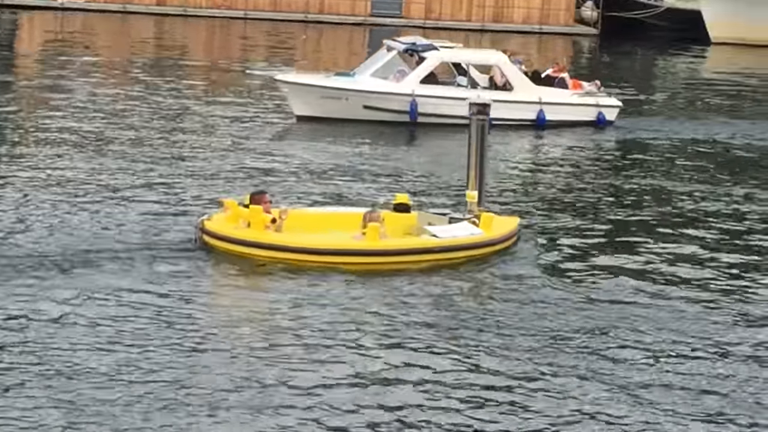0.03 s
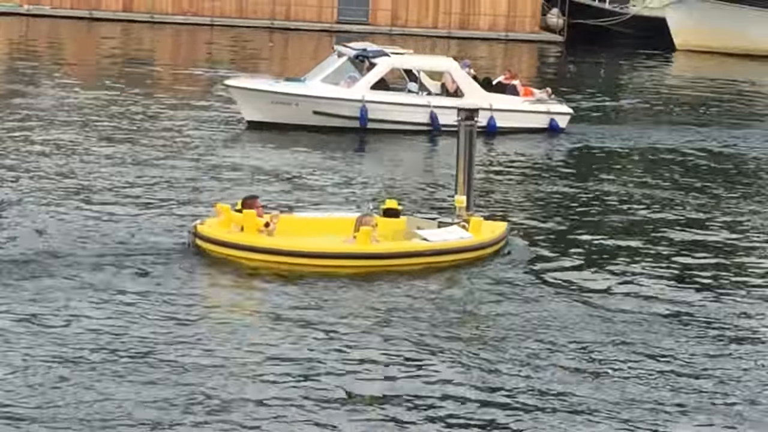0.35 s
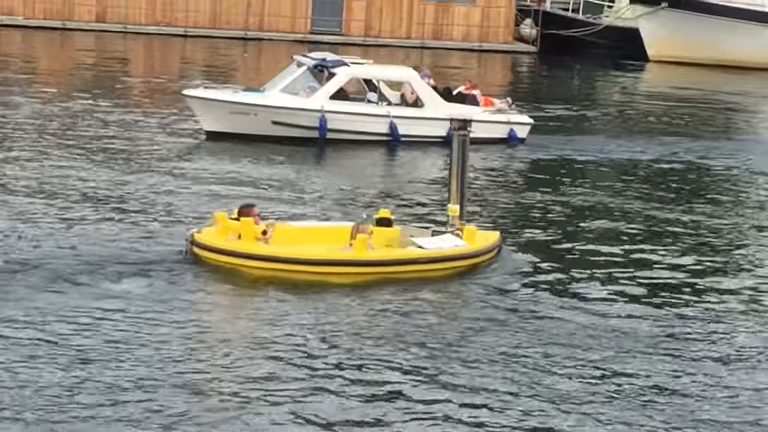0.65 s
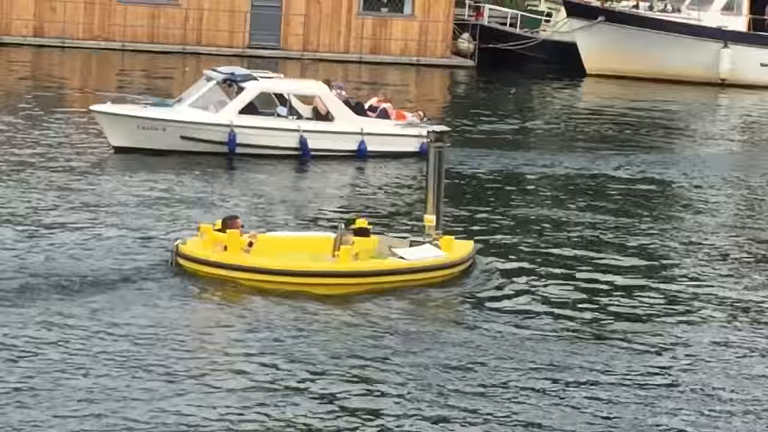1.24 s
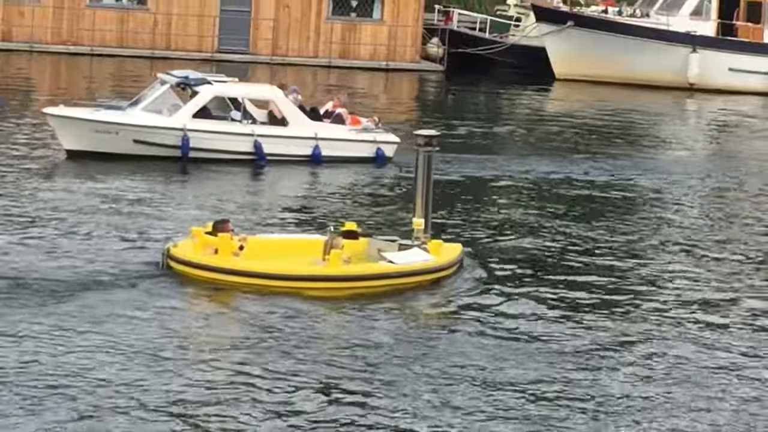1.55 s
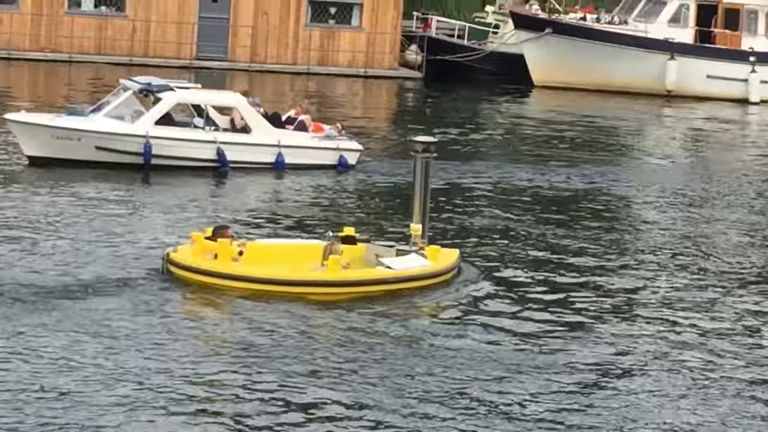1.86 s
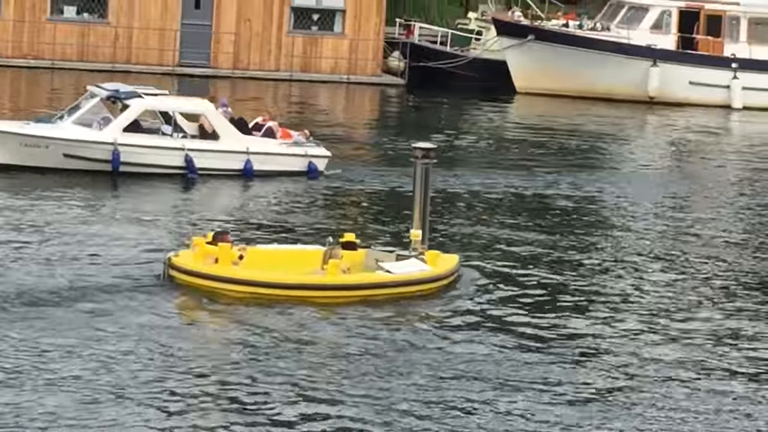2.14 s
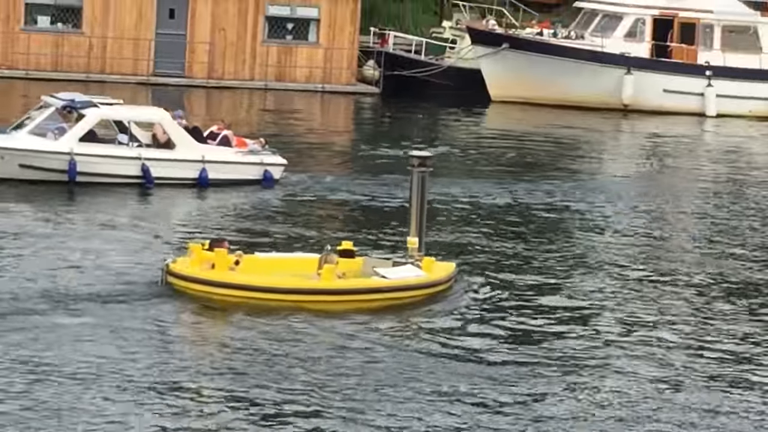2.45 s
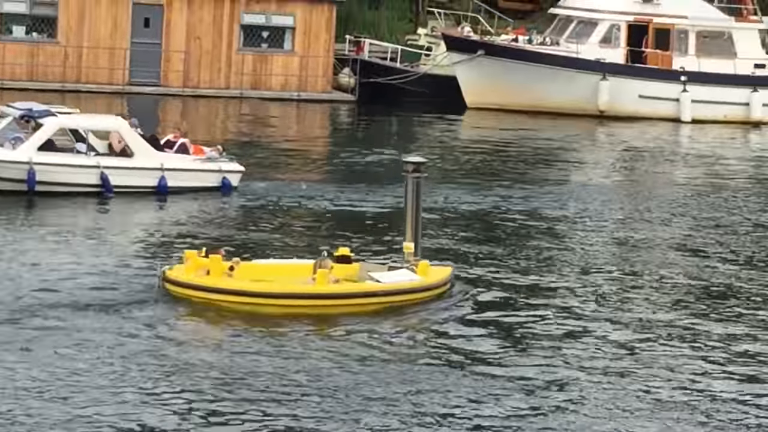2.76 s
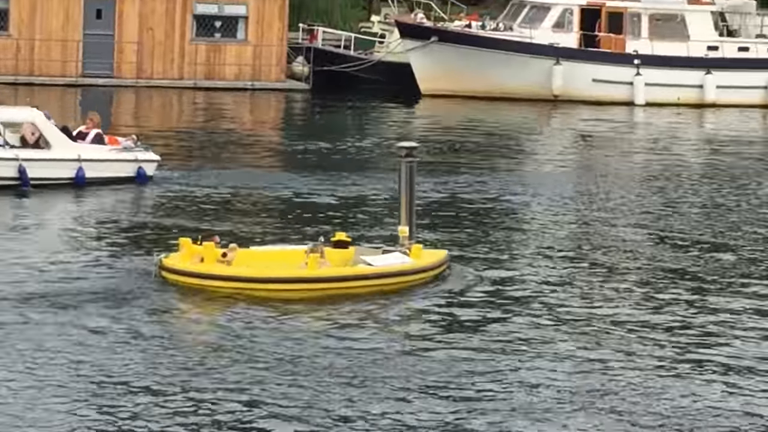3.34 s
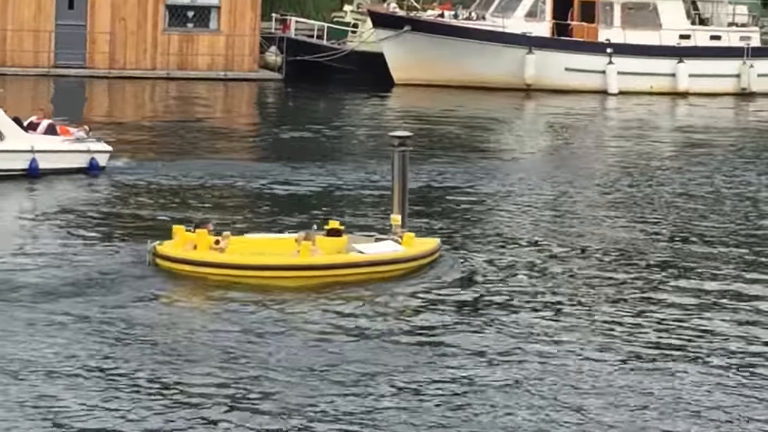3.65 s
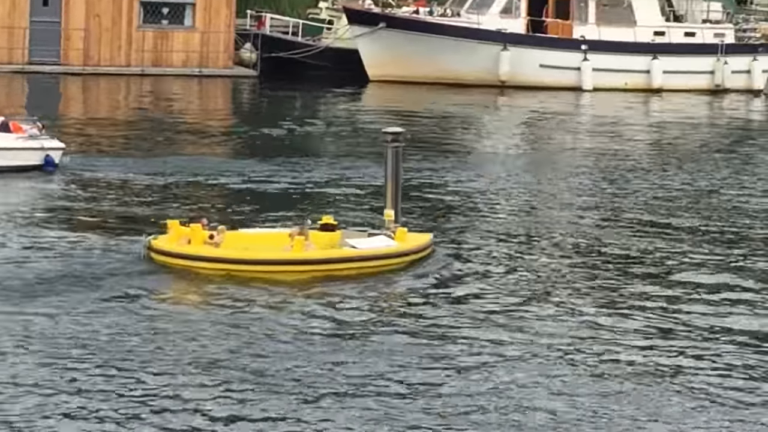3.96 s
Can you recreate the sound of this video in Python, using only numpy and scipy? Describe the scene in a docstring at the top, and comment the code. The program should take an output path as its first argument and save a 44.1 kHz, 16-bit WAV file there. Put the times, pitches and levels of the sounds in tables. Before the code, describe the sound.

Low chugging of an idling boat engine on a river, another engine booming up briefly.

```python
"""The low, lumpy rumble of a six-cylinder boat diesel idling, heard from the bank of a town river.
About two seconds in, a second, faster engine swells up for a second, barking and booming in its
exhaust pipe, and sinks back. Each engine is a cycle of cylinder knocks over the hum of its crank.
Behind them lies the wash of water and the far town, and wind buffets the microphone.
Close by, the water gurgles with ringing bubbles, a few faint ticks and small splashes."""
import sys
import numpy as np
from scipy import signal
from scipy.fft import rfft, irfft
from scipy.io import wavfile

SR = 44100
rng = np.random.default_rng(int(sys.argv[2]) if len(sys.argv) > 2 else 0)


def put_to_file(sound):
    """Save the sound as 16-bit audio at rate SR, in the file named by the first command-line argument."""
    columns = np.atleast_2d(sound).T  # one column per channel
    safe = np.clip(columns, -1, 1)
    whole_steps = np.round(safe * 32767)
    wavfile.write(sys.argv[1], SR, whole_steps.astype(np.int16))


N = 176400
TIME = np.arange(N) / SR
CYLINDERS = 6
IDLE_CYCLE_HZ, FAST_CYCLE_HZ = 6.122, 9.62  # every cylinder fires once a cycle

# rise and fall of the water's fine lapping: time_s, gain_db
LAPPING = [(0, 2), (.3, 2), (.75, 0.2), (1.1, 1), (1.8, -0.2), (2.5, -0.5), (2.75, 0), (3.1, -1), (3.5, 0),
           (4, 0.3)]


def from_db(db):
    """Decibels to gain."""
    return 10 ** (np.asarray(db) / 20)


def rms_one(x):
    """Scale to unit rms."""
    return x / np.sqrt(np.mean(x ** 2) + 1e-20)


def follow(points):
    """Join (time_s, value) points with straight lines, one value per sample."""
    return np.interp(TIME, *np.transpose(points))


def puff(centre_s, half_width_s):
    """A bell-shaped envelope of height 1."""
    return np.exp(-np.minimum(((TIME - centre_s) / half_width_s) ** 2, 50))


def drift(rate_hz):
    """A random wander of spread 1, mostly slower than rate_hz."""
    step, settle = 40, 2000  # coarse time grid; points dropped while the filter settles
    pole = np.exp(-2 * np.pi * rate_hz * step / SR)
    noise = rng.standard_normal(N // step + settle + 2)
    slow = signal.lfilter([1], [1, -2 * pole, pole * pole], noise)[settle:]
    return np.interp(np.arange(N) / step, np.arange(len(slow)), rms_one(slow))


def colour(x, spectrum):
    """Filter by (frequency_hz, gain_db) points, falling away steeply above the last; rms 1."""
    hz, db = np.transpose(spectrum)
    bins_hz = np.maximum(np.arange(N // 2 + 1) * SR / N, 1)
    gain = from_db(np.interp(np.log(bins_hz), np.log(hz), db)) / np.maximum(bins_hz / hz[-1], 1) ** 2
    return rms_one(irfft(rfft(x) * gain, N))


def resonate(x, hz, width_hz):
    """One resonance with gain 1 at its peak."""
    radius = np.exp(-np.pi * width_hz / SR)
    feedback = [1, -2 * radius * np.cos(2 * np.pi * hz / SR), radius ** 2]
    return signal.lfilter(np.array([1, 0, -1]) * (1 - radius ** 2) / 2, feedback, x + 1e-18)


def far_wash():
    """Water and the far town blend into a fluttering hiss whose treble follows the lapping."""
    # colour of the wash: frequency_hz, gain_db
    wash_spectrum = [(200, -6.5), (500, -4.5), (620, 1), (780, -0.5), (890, 4), (1100, 0), (1600, -6),
                     (2300, -17.5), (3000, -28.5), (3800, -27.5), (4700, -35), (6200, -34.5), (7500, -39.5),
                     (9300, -39.5), (10500, -44.5), (13000, -43), (16000, -50)]
    wash = from_db(-42 + 0.5 * drift(4.7)) * colour(rng.standard_normal(N), wash_spectrum)
    ripples = signal.sosfiltfilt(signal.butter(2, 1500, "high", fs=SR, output="sos"), wash)
    lapping_db = follow(LAPPING) + drift(8)
    return wash + ripples * (from_db(lapping_db) - 1)


def wind():
    """Gusts on the microphone make a low, uneven rumble."""
    # colour of the wind and far rumble: frequency_hz, gain_db
    rumble_spectrum = [(20, -36), (30, -35), (42, -10), (65, 4), (105, -4.5), (145, -6.5), (230, -11),
                       (320, -9), (450, -24), (900, -25.5)]
    # strength of the gusts: time_s, gain_db
    gust_curve = [(0, -7), (.07, 3), (.13, -2), (.25, -0.5), (.5, 1.5), (.68, -2.5), (.77, -1), (1.0, 0),
                  (1.12, -4), (1.22, -1), (1.6, 0.5), (2.1, 0), (2.45, -3.5), (2.78, -2.5), (2.96, 1.5),
                  (3.1, 0), (3.55, 1), (3.7, -2.5), (4, -1)]
    level_db = -35.5 + follow(gust_curve) + drift(4.7)
    return from_db(level_db) * colour(rng.standard_normal(N), rumble_spectrum)


def wind_thumps():
    """Single eddies buffet the microphone for a cycle or two."""
    # low thumps in the gusts: centre_s, peak_db, pitch_hz
    eddies = [(0.05, -30, 74.4), (0.745, -26, 70), (0.834, -24.5, 66), (0.91, -29, 72), (0.997, -27, 64),
              (1.208, -25, 87.5), (1.324, -27, 96), (2.955, -26, 68), (2.99, -27.5, 72.1)]
    return sum(from_db(db) * puff(centre_s, 0.014) * np.sin(2 * np.pi * (hz * TIME + rng.random()))
               for centre_s, db, hz in eddies)


def bubbles(per_s=900, t60_s=0.075):
    """A dense gurgle: bubbles of many sizes ring briefly, rising a little in pitch."""
    # loudness of bubbles from large to small: pitch_hz, relative_db
    bubble_sizes = [(1200, -3.5), (1800, 2.5), (2400, -1.5), (3000, -6.5), (4000, -13), (4800, -21.5),
                    (6500, -24)]
    size_hz, size_db = np.transpose(bubble_sizes)
    when, size, phases, chance = rng.random((int(per_s * N / SR), 4)).T
    pitches_hz = size_hz[0] * (size_hz[-1] / size_hz[0]) ** size
    extra_db = 2.0 * np.minimum(-np.log(1 - chance), 3)  # a few stand out
    gains = from_db(np.interp(np.log(pitches_hz), np.log(size_hz), size_db) + extra_db)
    age = np.arange(int(t60_s * SR * 2 / 3)) / SR
    envelope = from_db(-60 * age / t60_s) * (1 - np.exp(-age / 0.003))
    gurgle = np.zeros(N + len(age))
    for start, hz, phase, gain in zip((when * N).astype(int), pitches_hz, phases, gains):
        ring = np.sin(2 * np.pi * (phase + hz * age * (1 + age / 2)))
        gurgle[start:start + len(age)] += gain * envelope * ring
    return from_db(-54.5 + follow(LAPPING)) * rms_one(gurgle[:N])


def water_ticks(t60_s=0.016, band_ratio=1.35):
    """Short soft cracks of the water close by, each ringing in one broad band."""
    # single ticks: start_s, peak_db, ring_hz
    tick_events = [(0.888, -32.5, 1550), (1.475, -33, 1100), (1.538, -50, 6000), (1.624, -50, 3200),
                   (1.66, -50, 4000), (2.732, -46, 3400), (2.7405, -36, 3050), (2.79, -50, 4200),
                   (3.368, -46, 3200), (3.928, -48, 3200)]
    out = np.zeros(N)
    for start_s, db, hz in tick_events:
        decay = from_db(-60 * np.clip((TIME - start_s) / t60_s, 0, 4))
        crack = rng.standard_normal(N) * (TIME >= start_s) * decay
        band = signal.butter(2, [hz / band_ratio, hz * band_ratio], "band", fs=SR, output="sos")
        tick = signal.sosfilt(band, signal.sosfilt(band, crack + 1e-18))
        out += from_db(db) * tick / np.abs(tick).max()
    return out


def splashes():
    """Brief puffs of fine spray near the microphone."""
    # small splashes: centre_s, level_db, centre_hz, half_width_s
    splash_events = [(0.062, -61, 7750, 0.0035), (1.373, -62, 3600, 0.01), (1.527, -71, 9050, 0.015),
                     (2.741, -59, 5960, 0.0017), (2.745, -58, 3000, 0.039), (2.877, -64, 9200, 0.0076),
                     (2.91, -73, 7450, 0.011), (3.162, -74, 12000, .008), (3.288, -67.5, 5250, 0.013),
                     (3.369, -65, 3320, 0.0088), (3.542, -71, 13000, .012), (3.917, -66, 8300, .008)]
    out = np.zeros(N)
    for centre_s, db, hz, half_width_s in splash_events:
        width_hz = 0.54 * hz
        spray = rms_one(resonate(resonate(rng.standard_normal(N), hz, width_hz), hz, width_hz))
        out += from_db(db) * spray / (1 + ((TIME - centre_s) / half_width_s) ** 2)
    return out


def engine(cycle_hz, orders, body, knock_db, wander, uneven_db, knock_decay, fresh_share):
    """Two knocks per cylinder repeat each cycle, partly as fresh noise; orders hum on the same crank."""
    cycles = np.cumsum(cycle_hz * (1 + wander * drift(2))) / SR
    hum = np.zeros(N)
    for order, db in orders:
        amplitude = np.sqrt(2) * from_db(db + 2.0 * drift(1.94))
        hum += amplitude * np.sin(2 * np.pi * (order * cycles + rng.random()))
    knocks_per_cycle = 2 * CYLINDERS
    knock_count = cycles * knocks_per_cycle
    strengths = from_db(uneven_db * rng.standard_normal(knocks_per_cycle))
    strength = strengths[knock_count.astype(int) % knocks_per_cycle]
    rattle = rng.standard_normal(int(SR / cycle_hz))  # one cycle long
    repeating = rattle[(cycles % 1 * len(rattle)).astype(int)]
    gas = np.sqrt(1 - fresh_share) * repeating + np.sqrt(fresh_share) * rng.standard_normal(N)
    knocks = gas * strength * np.exp(-knock_decay * (knock_count % 1))
    return hum + from_db(knock_db) * colour(knocks, body)


def fast_engine():
    """The second boat's engine swells and fades at a steady speed."""
    # strong orders before the swell is applied: multiple_of_cycle_rate, level_db
    fast_orders = [(6, -38), (12, -42), (13, -54.5), (14, -49.5), (18, -40), (20, -43), (21, -45.5),
                   (24, -43), (27, -43.5), (29, -45.5), (32, -46), (36, -46.5), (38, -48), (42, -47),
                   (51, -52.5)]
    # colour of the exhaust and hull: frequency_hz, gain_db
    fast_body = [(60, -19), (130, -10), (200, 3), (280, 4), (400, -0.5), (600, -5), (780, -8), (950, -3.5),
                 (1200, -6), (1700, -18), (3500, -68)]
    # rise and fall of the engine: time_s, gain_db
    swell_curve = [(0, -26), (1.6, -51), (1.9, -6), (2.04, -2), (2.09, -2), (2.66, -0.5), (2.76, -2.5),
                   (2.85, -12.5), (3.4, -27.5), (4, -11.5)]
    running = engine(FAST_CYCLE_HZ, fast_orders, fast_body, knock_db=-36.5,
                     wander=0.002, uneven_db=4.5, knock_decay=1.0, fresh_share=0.35)
    return from_db(follow(swell_curve)) * running


def exhaust_barks():
    """Rough puffs from the faster engine's exhaust as it comes up."""
    # single barks: centre_s, level_db
    bark_events = [(2.089, -29.5), (2.15, -33.5), (2.199, -33.5)]
    # colour of a bark: frequency_hz, gain_db
    bark_body = [(100, -18), (190, -3), (280, 4), (400, -3.5), (520, -7), (1100, -25), (2500, -42)]
    envelope = sum(from_db(db) * puff(centre_s, 0.019) for centre_s, db in bark_events)
    return envelope * colour(rng.standard_normal(N), bark_body)


def pipe_boom(order=15, throb_peak_s=2.15):
    """One order of the faster engine booms in its pipe, throbbing once a cycle and shaking in pitch."""
    # boom of the exhaust pipe: time_s, level_db
    boom_curve = [(1.8, -52), (2.08, -49), (2.13, -32), (2.48, -31), (2.58, -33.5), (2.69, -32.5),
                  (2.78, -30.5), (2.84, -52), (3.0, -68)]
    cycles = FAST_CYCLE_HZ * (TIME - throb_peak_s)
    throb = 1 + 0.23 * np.cos(2 * np.pi * cycles + 0.25 * drift(2.2))
    tone = np.sin(2 * np.pi * order * cycles + 0.98 * drift(14.5))
    return from_db(follow(boom_curve)) * rms_one(throb * tone)


def exhaust_chugs(pitch_scatter=0.04):
    """Heavy firings of the idling diesel set its exhaust ringing, a little differently each time."""
    # heavy firings: centre_s, level_db
    chug_events = [(0.398, -33.5), (0.563, -34.5), (0.722, -36), (0.897, -34.5), (1.053, -38),
                   (1.222, -36.5), (1.378, -37), (1.68, -37), (1.97, -34), (2.84, -35), (3.005, -32),
                   (3.34, -35.5), (3.66, -35.5), (3.82, -37.5)]
    # resonances of the exhaust: pitch_hz, relative_db
    exhaust_modes = [(140, -11.5), (200, 0), (265, -15), (335, -6)]
    out = np.zeros(N)
    for centre_s, db in chug_events:
        ring = np.zeros(N)
        for mode_hz, mode_db in exhaust_modes:
            hz = mode_hz * (1 + pitch_scatter * rng.standard_normal())
            ring += from_db(mode_db) * np.sin(2 * np.pi * (hz * TIME + rng.random()))
        out += from_db(db) * puff(centre_s, 0.027) * ring
    return out


def idling_diesel(first_lump_s=0.058, lope_db=1.2, throb_db=1.3):
    """The slow diesel lopes once a cycle and throbs every second firing; its upper drone grows late."""
    # strong orders before lumps and drone are applied: multiple_of_cycle_rate, level_db
    idle_orders = [(6, -50.5), (10, -45.5), (12, -49), (13, -51.5), (15, -42.5), (16, -46.5), (21, -46.5),
                   (22, -43), (24, -48), (25, -46.5), (33, -57.5), (44, -53), (56, -49)]
    # colour of the exhaust and hull: frequency_hz, gain_db
    idle_body = [(30, -9), (58, 3), (140, 0), (205, 2.5), (230, -5.5), (330, -6.5), (400, -6.5), (500, -9),
                 (900, -21), (2000, -50), (4000, -72)]
    # lift of the upper drone: time_s, gain_db
    drone_curve = [(0, -0.5), (1.2, 3), (1.8, 2.5), (3.0, 1.5), (3.4, 0.5), (3.8, 7), (4, 0)]
    running = engine(IDLE_CYCLE_HZ, idle_orders, idle_body, knock_db=-42.5,
                     wander=0.00391, uneven_db=0.5, knock_decay=0.92, fresh_share=0.43)
    drone = signal.sosfiltfilt(signal.butter(2, [280, 450], "band", fs=SR, output="sos"), running)
    beat = 2 * np.pi * IDLE_CYCLE_HZ * (TIME - first_lump_s)
    lumps_db = lope_db * np.cos(beat) + throb_db * np.cos(beat * CYLINDERS / 2)
    return rms_one(from_db(lumps_db)) * (running + drone * (from_db(follow(drone_curve)) - 1))


def scene():
    """Both boats, the water and the wind at one microphone on the bank."""
    boats = idling_diesel() + exhaust_chugs() + fast_engine() + pipe_boom() + exhaust_barks()
    near_water = bubbles() + water_ticks() + splashes()
    background = wind() + far_wash() + wind_thumps()
    return (boats + near_water + background)[None]


def record(dry):
    """The microphone drops the deepest bass; the top is cut steeply."""
    low_cut = signal.butter(2, 26, "high", fs=SR, output="sos")
    high_cut = signal.ellip(12, 0.1, 80, 15750, fs=SR, output="sos")
    return signal.sosfilt(high_cut, signal.sosfilt(low_cut, dry))


dry = scene()
out = record(dry)
put_to_file(out)
```